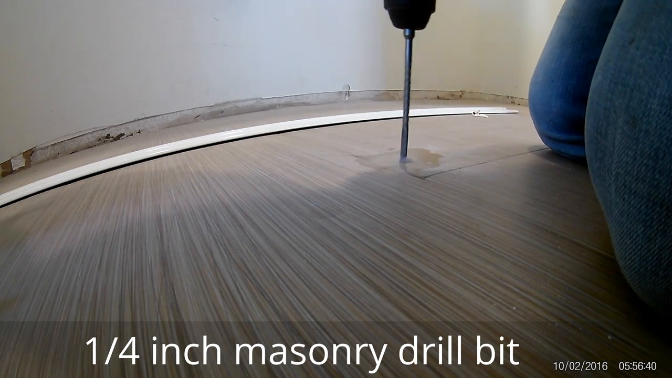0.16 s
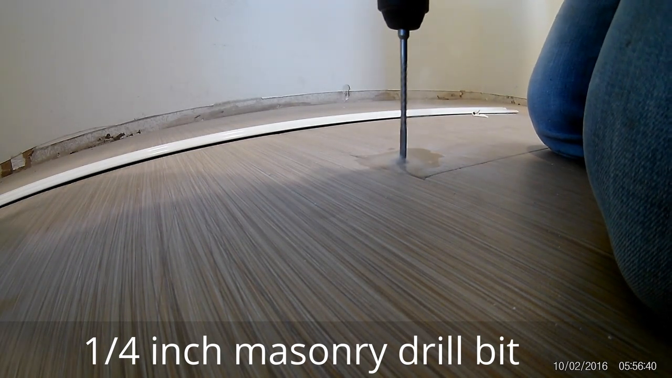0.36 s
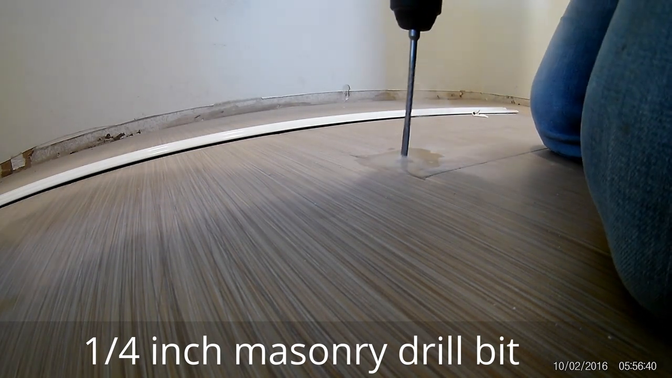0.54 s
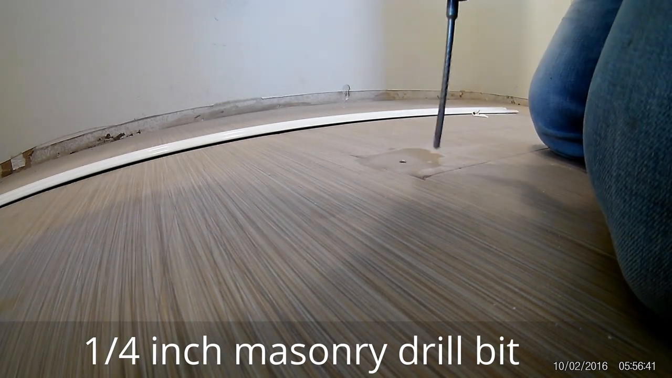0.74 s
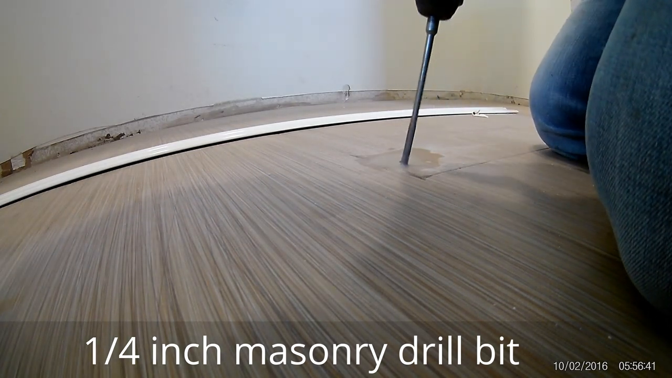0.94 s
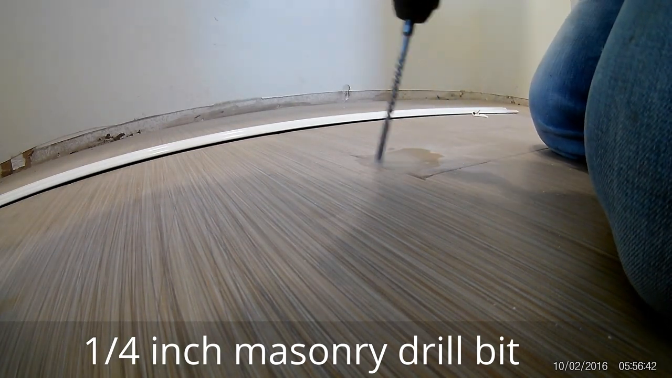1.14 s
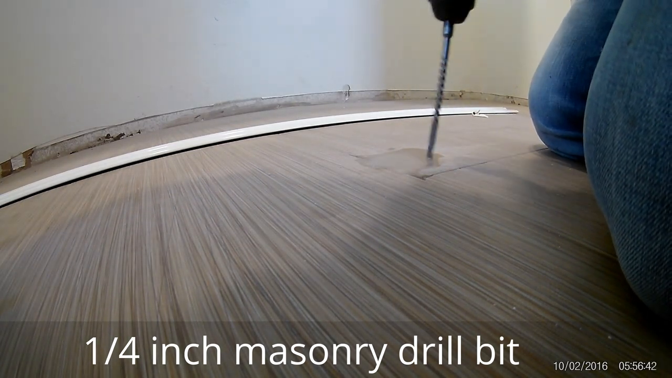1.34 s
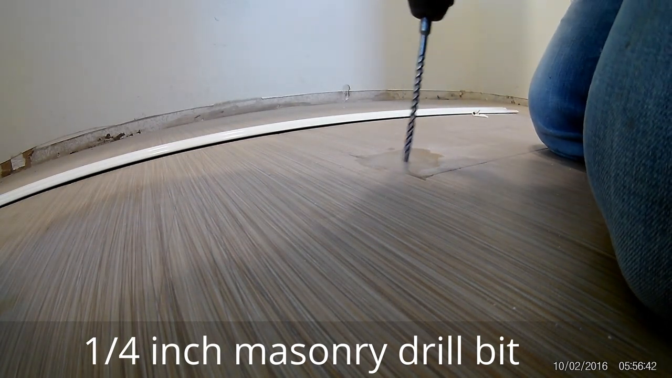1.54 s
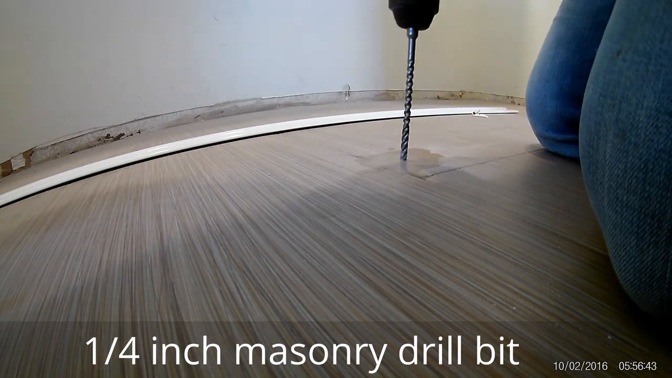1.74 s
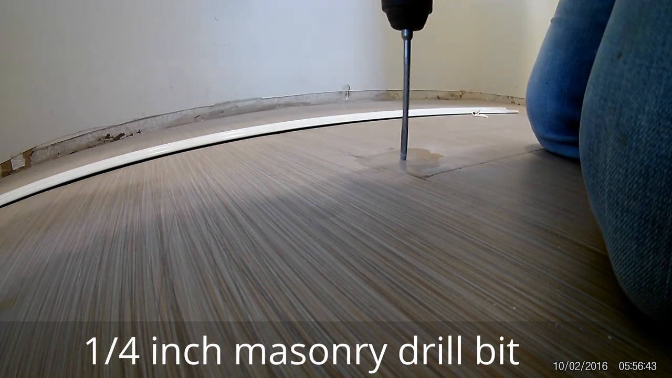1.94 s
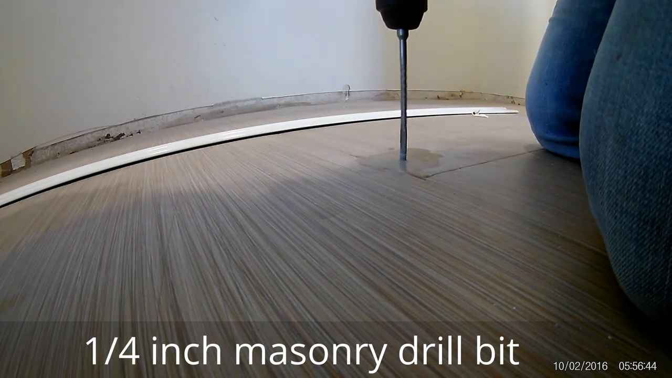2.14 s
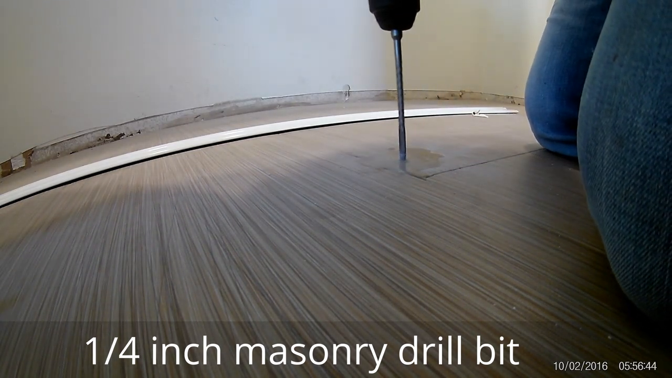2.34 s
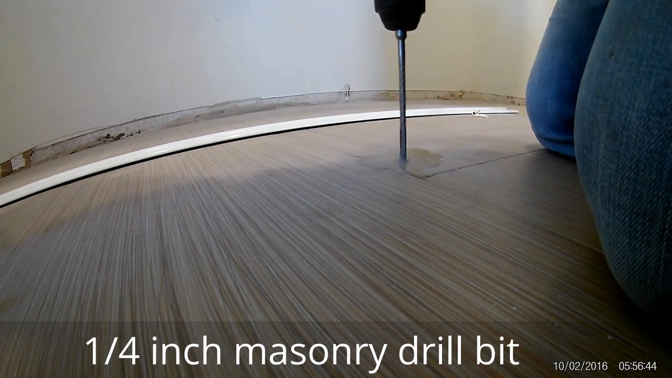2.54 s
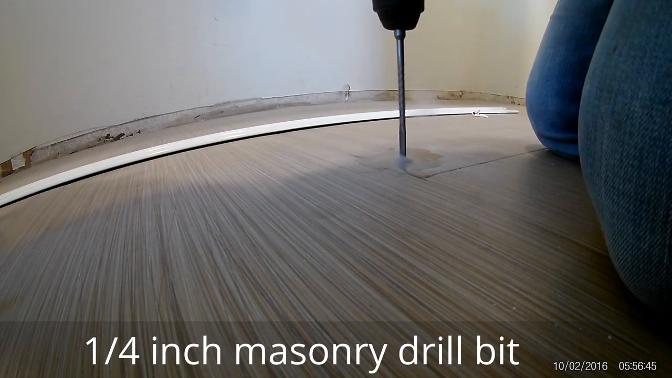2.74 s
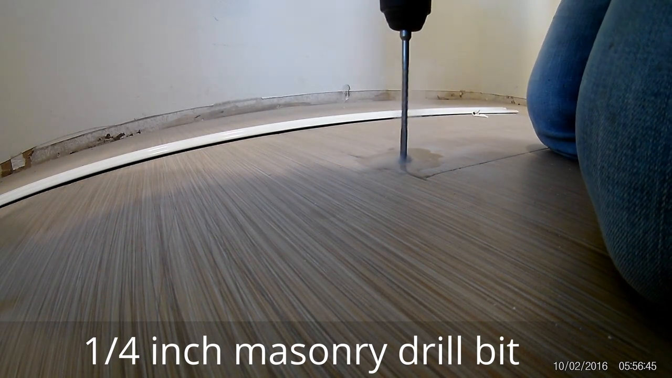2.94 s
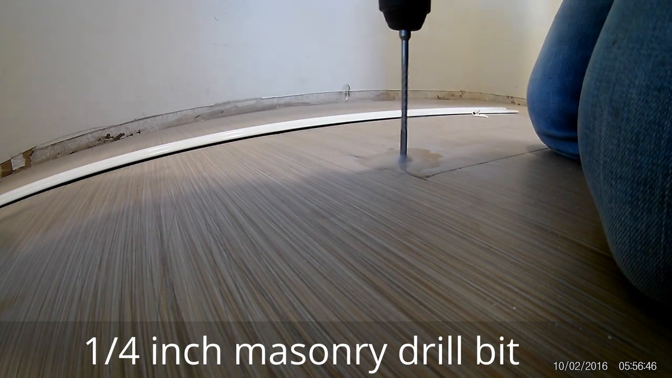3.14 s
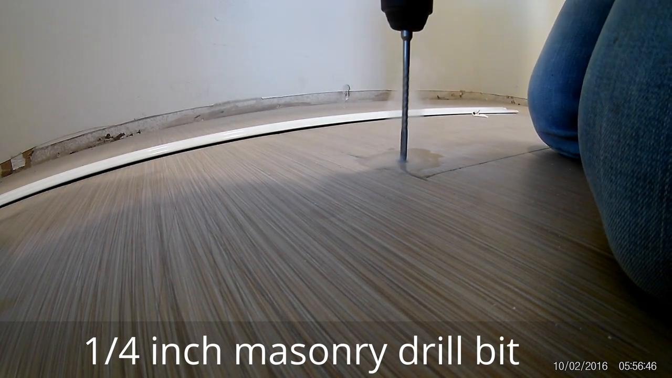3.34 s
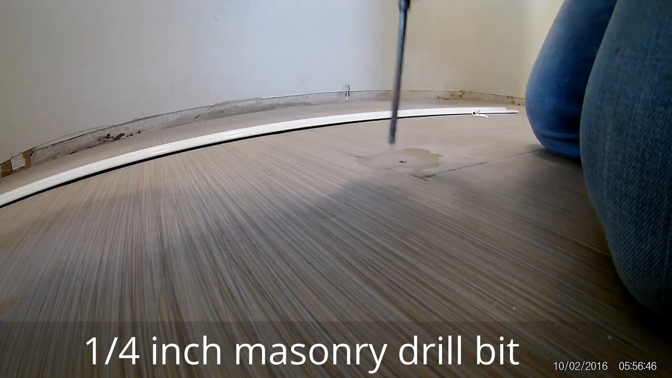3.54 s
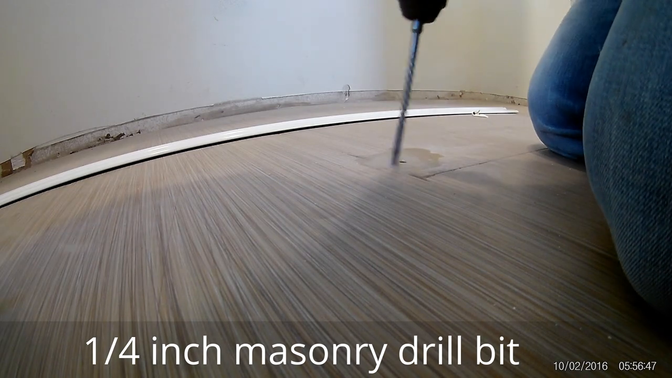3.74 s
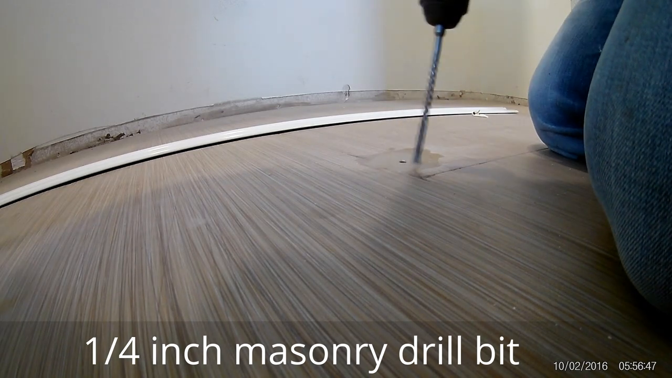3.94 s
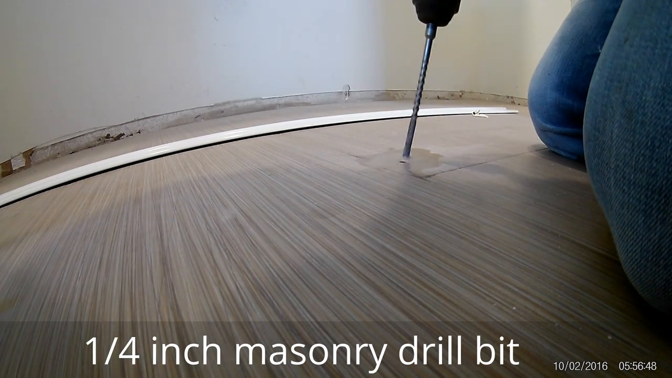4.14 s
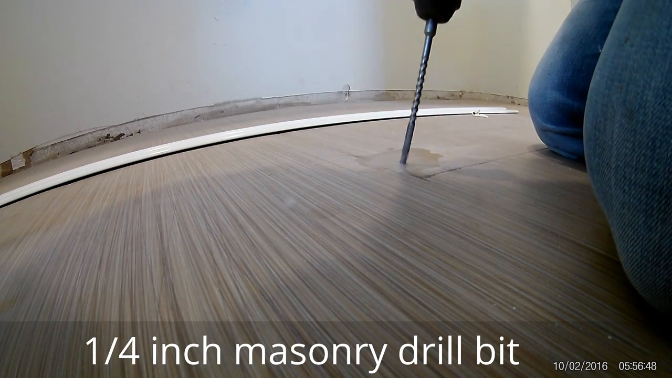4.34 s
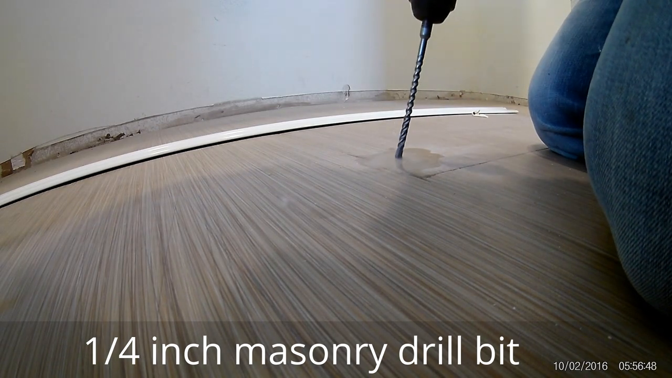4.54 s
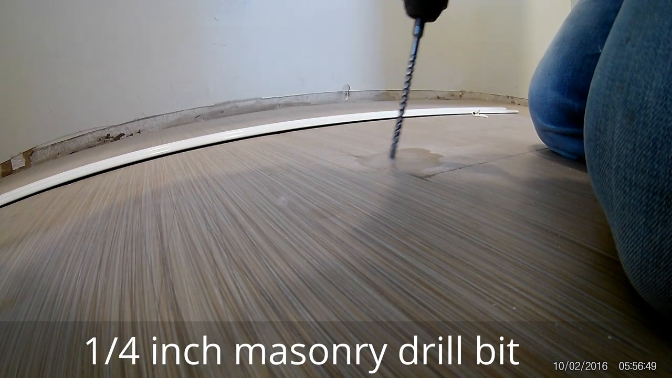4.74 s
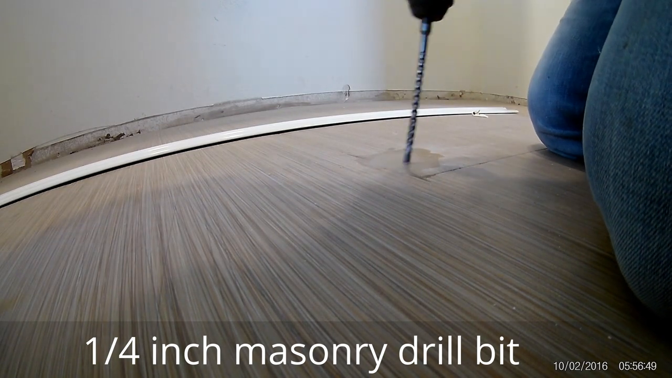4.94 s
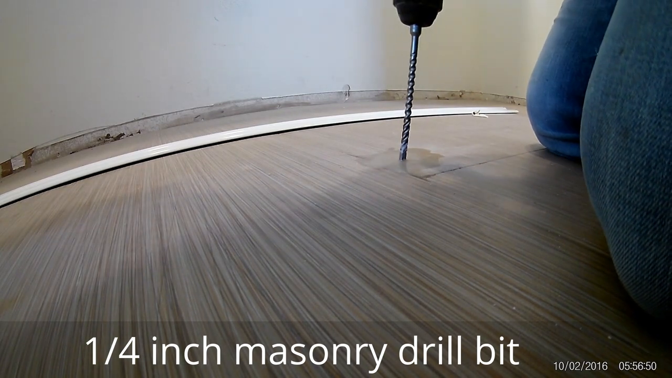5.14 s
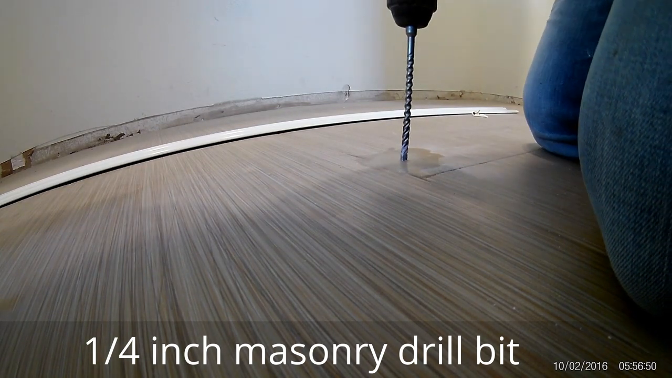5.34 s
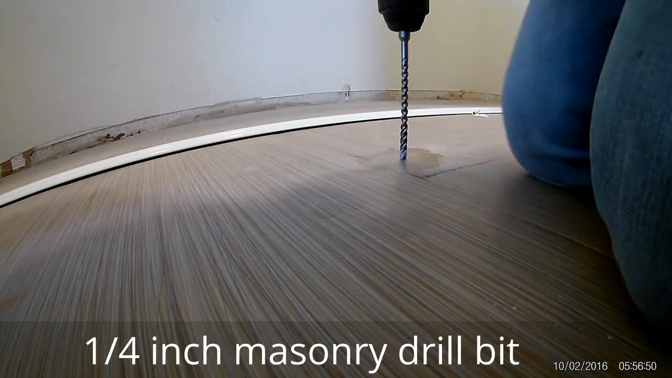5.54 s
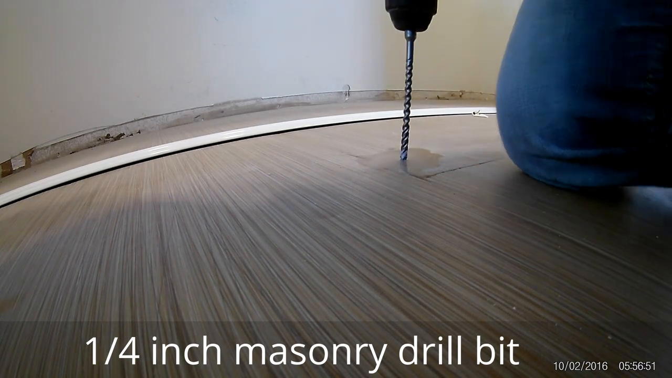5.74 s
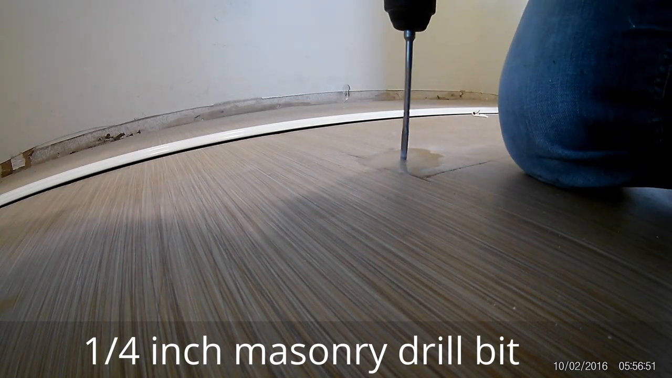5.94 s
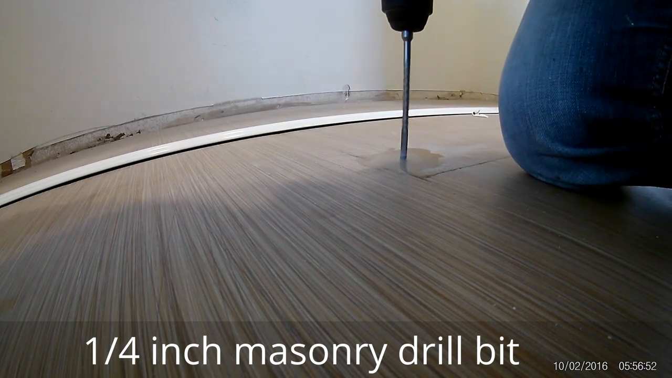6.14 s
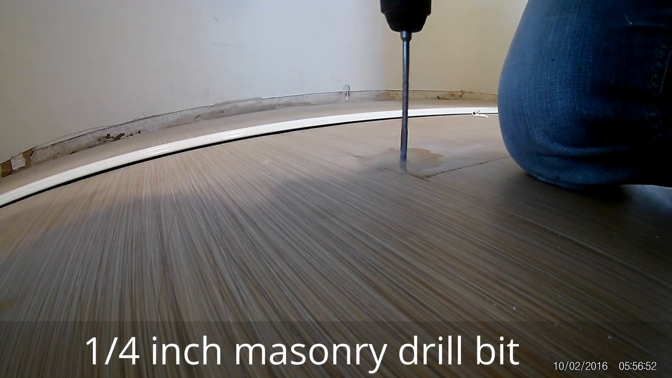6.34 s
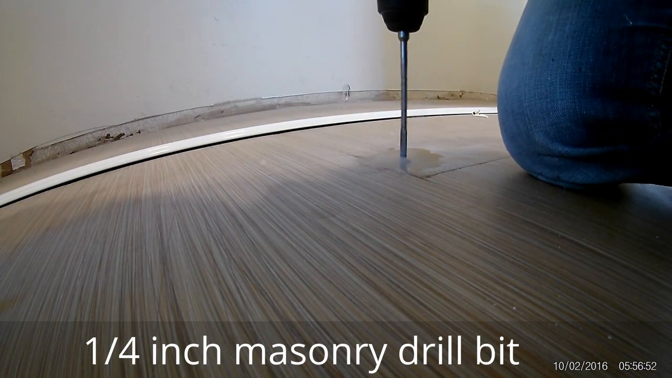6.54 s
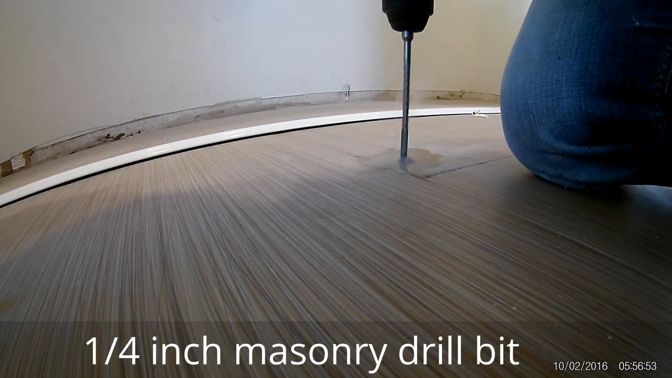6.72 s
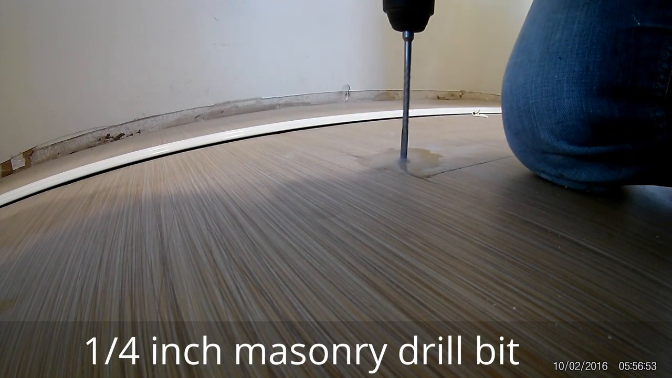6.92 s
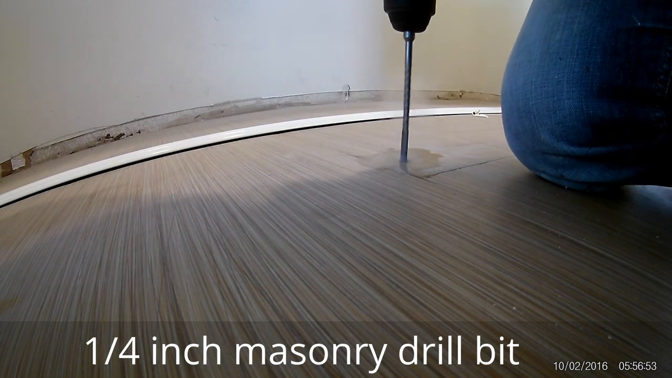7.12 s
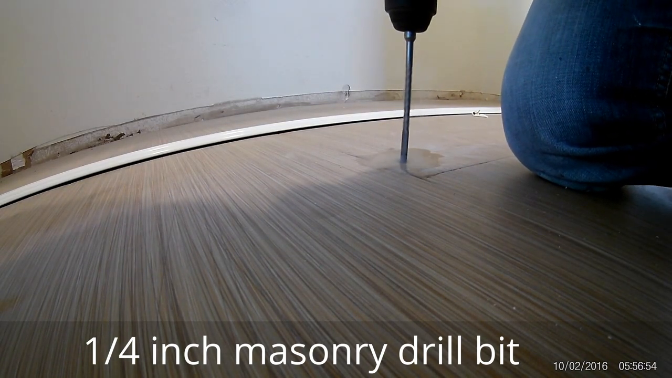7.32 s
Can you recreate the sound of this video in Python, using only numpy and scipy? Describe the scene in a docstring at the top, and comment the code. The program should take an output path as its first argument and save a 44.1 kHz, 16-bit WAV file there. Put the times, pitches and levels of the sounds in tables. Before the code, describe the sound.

Close mono pickup of a rotary hammer drill on hard tile indoors: a short tail of drilling, a rattling coast-down with bit drags and knocks, a second steady buzzing burst of about a second and a half, a longer coast-down with scratching and hard taps, then a squealing restart and buzzing drilling until the cut. Short room echo, faint room tone, little deep bass.

```python
"""A hammer drill bites into wet floor tile in three bursts in a small bare room, close to a mono microphone.
Under load its hammer drums the floor about a hundred times a second, made of sine partials and grinding noise,
and its gears hum and whine as sines that follow the motor speed. Between bursts the motor coasts down with rattle
and fan hiss, while the bit drags and knocks: noise and random clicks ring the bit and the floor. The second and
third bursts start with a trigger click and a short squeal. Quiet room tone lies under everything."""
import sys
import numpy as np
from scipy import signal
from scipy.fft import rfft, irfft, next_fast_len
from scipy.io import wavfile

SR = 44100
rng = np.random.default_rng(int(sys.argv[2]) if len(sys.argv) > 2 else 0)


def invert_db(level):
    """Linear amplitude ratio for a level in decibels (20 dB per decade), elementwise."""
    return 10 ** (np.asarray(level, dtype=float) / 20)


def master_out(mix):
    """Clip the mix to full scale and print it as 16-bit PCM to the path in sys.argv[1]."""
    frames = np.transpose(np.atleast_2d(mix))
    ceiling = np.clip(frames, -1, 1)
    pcm = np.round(ceiling * 32767).astype(np.int16)
    wavfile.write(sys.argv[1], SR, pcm)


N = 325444   # length in samples
WORKING_HZ = 870   # gear tone at working speed
BLOWS_PER_GEAR_CYCLE, TEETH_PER_GEAR_CYCLE = 3 / 26, 5


def rms_one(x):
    """Scale to rms 1."""
    return x / np.sqrt(np.mean(x ** 2) + 1e-20)


def in_time(tables, rest):
    """Columns of several tables on the sample grid, at the rest value between tables."""
    t = np.arange(N) / SR
    out = np.full((len(tables[0][0]) - 1, N), float(rest))
    for rows in tables:
        s, *columns = np.transpose(rows)
        inside = (t >= s[0]) & (t <= s[-1])
        out[:, inside] = [np.interp(t[inside], s, c) for c in columns]
    return out


def soften(x, seconds):
    """Smooth with one pole, so that steps turn into short glides."""
    r = np.exp(-1 / (seconds * SR))
    return signal.lfilter([1 - r], [1, -r], x, zi=[r * x[0]])[0]


def drift(rate_hz):
    """Slow random wandering of spread 1: noise through two equal poles, made at every 40th sample."""
    r = np.exp(-2 * np.pi * rate_hz * 40 / SR)
    slow = signal.lfilter([1], [1, -2 * r, r * r], rng.standard_normal(N // 40 + 2002))
    slow = rms_one(slow[2000:])   # skip the filter's start
    return np.interp(np.arange(N) / 40, np.arange(len(slow)), slow)


def colour(x, spectrum):
    """Give a dense signal the shape of a spectrum, at rms 1."""
    size = next_fast_len(N)
    hz, level_db = np.transpose(spectrum)
    log_hz = np.log(np.arange(1, size // 2 + 2) * SR / size)
    gain = invert_db(np.interp(log_hz, np.log(hz), level_db))
    return rms_one(irfft(rfft(x, size) * gain, size)[:N])


def resonate(x, modes):
    """Ring parallel resonances of alternating sign; a narrower one rings longer."""
    out = 0
    for k, (hz, width_hz, level_db) in enumerate(modes):
        r = np.exp(-np.pi * width_hz / SR)
        top = [(1 - r * r) / 2, 0, (r * r - 1) / 2]
        bottom = [1, -2 * r * np.cos(2 * np.pi * hz / SR), r * r]
        out = out + (-1) ** k * invert_db(level_db) * signal.lfilter(top, bottom, x + 1e-18)
    return out


def between(x, low_hz, high_hz):
    """Butterworth band-pass."""
    return signal.sosfilt(signal.butter(3, [low_hz, high_hz], "band", fs=SR, output="sos"), x)


def grains(per_s, spread_db):
    """Random clicks of either sign; a larger spread makes their sizes less even."""
    sizes = invert_db(spread_db * np.minimum(rng.exponential(1, N), 5)) * rng.choice([-1, 1], N)
    return sizes * (rng.random(N) < per_s / SR)


def swell(at_s, rise_s, fall_s, level_db):
    """Gain that climbs to a peak and sinks again, straight in dB; one value a millisecond."""
    since = np.arange(0, N / SR, .001) - at_s
    return invert_db(level_db - 20 * np.maximum(-since / rise_s, since / fall_s))


# Gear tone while the trigger is held, one table a burst: start_s [s], pitch_hz [Hz]
BURSTS = [
    [(0, 868.5), (.26, 880), (.49, 866), (.57, 862.5)],
    [(1.9, 303), (1.95, 516.8), (2.034, 760), (2.09, 836.5), (2.148, 870.4), (2.21, 892), (2.3, 899),
     (2.44, 889.2), (2.78, 868), (2.85, 860), (3.12, 863), (3.18, 852), (3.31, 857), (3.5, 850.5)],
    [(5.825, 330), (5.9, 585), (5.94, 704), (5.99, 775.7), (6.09, 692.4), (6.14, 749.6), (6.2, 831),
     (6.26, 861.3), (6.4, 903), (6.5, 891.7), (6.7, 884.3), (6.95, 870), (7.38, 872)],
]
# Trigger let go: start_s [s], pitch_hz then [Hz], slowing [1/s], extra_slowing [1/s2]
COASTS = [(.575, 832.4, 1.02, .44), (3.5, 817, 1.02, .44)]


def gear_speed():
    """Gear tone in Hz over time, and 1 while coasting: friction and the fan slow the free rotor."""
    t, hz, coasting = np.arange(N) / SR, in_time(BURSTS, rest=0)[0], np.zeros(N)
    for (start_s, start_hz, slowing, extra), before, after in zip(COASTS, BURSTS, BURSTS[1:]):
        free = (t > before[-1][0]) & (t < after[0][0])
        since = t[free] - start_s
        hz[free] = start_hz * np.exp(-slowing * since - extra * since ** 2)
        coasting[free] = 1
    return soften(hz, .004), soften(coasting, 0.016)


# Multiples of the blow rate: multiple [blow rate], level_db at usual feed [dB],
# follows [0 bite, 1 weight, 2 buzz], share of that feed's swing [0 to 1], waver_db [dB]
BLOW_PARTIALS = [(1, -27, 1, .99, .5), (1.5, -41, 1, 0.082, 3.5), (2, -35, 0, 0.17, 3), (3, -20, 0, 1, 2),
                 (4, -21.5, 2, 0.82, 1.5), (5, -27, 2, 0.81, 2.5), (6, -33, 2, 1, 3), (7, -23, 2, 0.88, 3),
                 (8, -21, 0, 0.25, 2.5), (11, -29, 2, 0.37, 3.5), (12, -27.5, 2, 0.27, 2),
                 (14, -35, 2, 0.36, -6), (15, -34.5, 2, 0.2, 3.5), (16, -40.5, 2, 0.4, 7.5),
                 (19, -40, 2, .6, 0), (20, -26.5, 2, 0.21, 5.5)]
# The hand on the drill, one table a burst: start_s [s], bite_db of the tip [dB],
# weight_db leaned on the floor [dB], buzz_db of the tile [dB]
FEED = [
    [(0.0, -31, -50, -25), (0.056, -16, -38, -20), (0.154, -22, -34, -30.5), (0.182, -22, -37, -27),
     (0.338, -31, -43, -28), (0.386, -44, -57, -28), (0.426, -32, -48, -32), (0.474, -21, -64, -29),
     (0.506, -19, -43, -29), (0.558, -18, -40, -23), (0.618, -32, -43, -45), (0.678, -49, -75, -54),
     (0.72, -63, -52, -62)],
    [(1.9, -50, -54, -48), (2.016, -35, -47, -28), (2.094, -18, -53, -40), (2.182, -26, -36, -22),
     (2.314, -14, -36, -23.5), (2.358, -17, -37, -32), (2.464, -27.5, -29, -28.5), (2.826, -26, -33.5, -34),
     (3.02, -43, -27, -26.5), (3.098, -20.5, -28.5, -25), (3.356, -20.5, -29.5, -32.5),
     (3.474, -21, -29, -25), (3.65, -71, -58, -64)],
    [(5.83, -26, -47, -42), (5.89, -40, -44, -22), (5.984, -31, -27, -20.5), (6.252, -28, -29, -32),
     (6.364, -16, -24, -21.5), (6.782, -21.5, -24, -21.5), (6.876, -32, -26, -14.5),
     (6.958, -19, -26.5, -16.5), (7.05, -19, -28, -11.5), (7.148, -28, -25, -22), (7.226, -16, -29, -13),
     (7.352, -22, -26, -18), (7.38, -19, -30, -10)],
]
# Usual feed: bite_db, weight_db, buzz_db [dB]
USUAL_FEED_DB = [-22, -32, -24]
# Shape of the grinding noise: pitch_hz [Hz], level_db [dB per Hz, relative]
GRIND_SPECTRUM = [(530, -53), (900, -13), (944, -9), (1050, -5.5), (1510, -3), (1700, -0.5), (2160, 0),
                  (3220, -7), (3980, -12.5), (4270, -13.5), (4750, -17), (6240, -19), (8880, -16.5),
                  (12800, -31), (15100, -66)]
# Shape of the floor noise under the blows: pitch_hz [Hz], level_db [dB per Hz, relative]
RUMBLE_SPECTRUM = [(40, -50), (70, -33), (102, -17), (200, -41), (300, 5), (360, -10.5), (410, -3.5),
                   (480, -7.5), (720, 2.5), (940, -7), (1300, -30.5)]
# Ringing of chuck and bit under load: pitch_hz [Hz], width_hz [Hz], level_db [dB, relative]
TOOL_MODES = [(1330, 40, -13), (1722, 16, 12.5), (1890, 31, 5), (2310, 29, -7.5), (3460, 620, -2),
              (3860, 80, 21), (4870, 140, 3)]
# Resonances of the floor: pitch_hz [Hz], width_hz [Hz], level_db [dB, relative]
FLOOR_MODES = [(136, 27, -11.5), (296.6, 24, -3), (417, 19, -0.5), (540, 44, -3), (731, 43, -0.5),
               (770, 19, 4), (1014, 46, -11.5)]


def hammer(hz, turns, coasting, unsettled):
    """Blows drum the floor as partials, ragged at low speed; each clicks and the tip grinds in a spurt after it."""
    run_out_s, let_go_s = 0.047, 0.014   # the drumming runs on longer than the grinding
    feed_db = in_time(FEED, rest=-60) - np.reshape(USUAL_FEED_DB, (3, 1))   # above or below usual
    blows = BLOWS_PER_GEAR_CYCLE * turns
    stumble = .12 * unsettled * drift(25)
    drumming = 0
    for multiple, level_db, follows, share, waver_db in BLOW_PARTIALS:
        # below working speed the second partial swells and those far from it fade
        skid_db = unsettled * (7 - 6.5 * abs(np.log2(multiple / 2)))
        level = invert_db(level_db + skid_db + waver_db * drift(13.6) + share * feed_db[round(follows)])
        phase = multiple * (2 * np.pi * blows + 0.054 * drift(7.2) + stumble)
        drumming = drumming + level * np.sin(phase + rng.normal(0, .6))

    spurt = 1 + .6 * np.exp(-3.0 * (blows % 1))   # strongest just after each blow
    grit = rng.standard_normal(N) + 0.53 * rms_one(grains(per_s=1800, spread_db=0.0))
    grit = rms_one(grit * spurt * invert_db(0.64 * drift(7)))
    clicks = np.diff(np.floor(blows + .03 * drift(60)), prepend=0) * invert_db(1.1 * drift(63))
    grit = grit + 0.35 * (1 - unsettled) * rms_one(clicks)
    grinding = colour(grit, GRIND_SPECTRUM)
    grinding += invert_db(-15.5) * rms_one(resonate(grit, TOOL_MODES))
    grinding += invert_db(-8) * colour(grit, RUMBLE_SPECTRUM)
    # a skidding tip shakes the floor modes
    grinding += invert_db(-8) * unsettled * rms_one(resonate(grit, FLOOR_MODES))
    # 7 dB per octave of speed, and a little with the bite
    grind_db = -14.5 + 7 * np.log2(np.clip(hz / WORKING_HZ, .01, 1)) + 0.021 * feed_db[0]
    drumming = (1 - soften(coasting, run_out_s)) * drumming
    return drumming + (1 - soften(coasting, let_go_s)) * invert_db(grind_db) * grinding


# Gear tone as the floor carries it: pitch_hz [Hz], level_db [dB rms before waver]
HUM = [(300, -50), (560, -42), (650, -35), (720, -15.5), (780, -24.5), (835, -29), (870, -24.5), (900, -41)]
# Tooth whine as the case carries it: pitch_hz [Hz], level_db [dB rms before waver]
WHINE = [(1500, -50), (2900, -49), (3500, -32), (3950, -32.5), (4200, -24), (4290, -31.5), (4360, -21.5),
         (4440, -26.5), (4500, -34)]
# Fine lines beside the whine: multiple [gear tone], level_db [dB before waver]
SIDE_TONES = [(2, -23.5), (5.43, -42), (5.83, -37), (6.05, -33), (6.26, -36), (8.13, -38.5), (8.67, -37.5),
              (9.17, -44), (10, -37)]
# Rotor tones: multiple [gear tone], level_db before the case and the speed act on it [dB]
ROTOR_TONES = [(15, -40), (20, -46), (24, -44), (30, -52), (39, -52)]
# What the case lets out: pitch_hz [Hz], level_db [dB]
HOUSING = [(3500, -30), (4600, -14), (5200, -2), (5900, -17), (7500, 0), (9500, -16), (11000, -5),
           (12500, -18), (14500, -24), (15500, -26)]


def gear_tones(hz, turns, coasting, unsettled):
    """Loaded gears hum and whine; rotor tones slide through the resonances of the case."""
    loaded = 1 - coasting
    gear_phase = 2 * np.pi * turns
    tooth_hz, tooth_phase = TEETH_PER_GEAR_CYCLE * hz, TEETH_PER_GEAR_CYCLE * gear_phase
    hum = loaded * invert_db(np.interp(hz, *np.transpose(HUM))) * np.sqrt(2)
    whine = loaded * invert_db(np.interp(tooth_hz, *np.transpose(WHINE))) * np.sqrt(2)
    hum = soften(hum, 0.0067) * invert_db(4.0 * drift(4.5))
    out = hum * np.sin(gear_phase + (.15 + .9 * unsettled) * drift(30))
    whine = soften(whine, 0.0096) * invert_db(2.5 * drift(15))
    out += whine * np.sin(tooth_phase + .25 * drift(60))

    fading = np.clip((hz - 370) / 180, 0, 1)
    fading = fading + 1.85 * np.exp(-((hz - 770) / 60) ** 2)   # swells past a floor mode
    out += coasting * fading * invert_db(-34.5 + 2 * drift(5)) * np.sin(gear_phase)

    for multiple, level_db in SIDE_TONES:
        level = loaded * (1 - unsettled) ** 2 * invert_db(level_db + 3.2 * drift(8.9))
        out += level * np.sin(multiple * gear_phase + 0.23 * drift(30))

    case_hz, case_db = np.transpose(HOUSING)
    push = coasting * (hz / 500) ** 1.5   # weaker as the rotor slows
    for multiple, level_db in ROTOR_TONES:
        escapes_db = np.interp(multiple * hz, case_hz, case_db, left=-90, right=-90)
        level = push * invert_db(level_db + escapes_db + 2.5 * drift(9))
        out += level * np.sin(multiple * gear_phase + .8 * drift(30))
    return out


# Shape of the room tone: pitch_hz [Hz], level_db [dB per Hz, relative]
ROOM_TONE_SPECTRUM = [(15, -32), (25, -16), (86, -10.5), (264, -17.5), (811, -22.5), (1350, -26),
                      (1670, -36), (3440, -24), (6200, -46), (15000, -49)]


def room_tone():
    """Steady quiet noise, strongest in the low range."""
    return invert_db(-48) * colour(rng.standard_normal(N), ROOM_TONE_SPECTRUM)


# Shape of the gear rattle: pitch_hz [Hz], level_db [dB per Hz, relative]
RATTLE_SPECTRUM = [(35, -63), (60, -38), (194, -31), (404, -24), (472, -15.5), (721, -5), (962, -7.5),
                   (1650, 1.5), (1890, -3.5), (2470, -1.5), (6000, -19), (7800, -44), (13200, -120)]
# Shape of the fan hiss: pitch_hz [Hz], level_db [dB per Hz, relative]
FAN_SPECTRUM = [(2650, -37), (4500, -27), (6420, -3), (7700, 5), (9290, 3), (10700, -4), (13000, -9),
                (15100, -23)]


def motor(hz, coasting):
    """While coasting, loose gears rattle and the fan hisses, both sinking with speed."""
    speed = np.clip(hz / WORKING_HZ - .1, 0, 1)
    rattle = rng.standard_normal(N) + 0.74 * rms_one(grains(per_s=1200, spread_db=-10.5))
    rattle = speed ** 0.95 * invert_db(-19.0 + 0.84 * drift(23)) * colour(rattle, RATTLE_SPECTRUM)
    fan = invert_db(-30) * speed ** 1.13 * colour(rng.standard_normal(N), FAN_SPECTRUM)
    return coasting * (rattle + fan)


# Scrapes of the bit over the tile, and a faint rustle at 5.62 s: loudest_s [s],
# rise_s and fall_s [s for 20 dB], level_db [dB, relative], thud_db share of the floor [dB]
SCRAPES_AND_RUSTLE = [(.62, 0.057, 0.26, -10.5, -21), (.85, 0.35, 0.5, -21.5, -14),
                      (1.133, .06, 0.086, -13, -8), (1.2, 0.022, .1, -31, -3),
                      (1.33, 0.14, 0.17, -19.5, -13), (1.412, 0.11, 0.1, -13.5, -8.5),
                      (1.48, 0.17, .2, -28, -9), (1.6, 0.25, 0.092, -19, -10.5),
                      (1.715, 0.025, 0.074, -16.5, 8), (3.55, .03, 0.087, -9.5, -21),
                      (3.65, .1, .3, -13.5, -18), (3.76, 0.068, 0.22, -12, -8.5),
                      (3.93, 0.069, 0.17, -15, -8), (3.999, .1, .12, -27, 1), (4.15, 0.061, .15, -19, -22),
                      (4.216, 0.085, 0.045, -15, -4), (4.3, 0.055, .08, -23, -20),
                      (4.37, 0.023, 0.089, -19, -13), (4.53, 0.026, 0.14, -17.5, -12),
                      (4.61, .04, 0.066, -17.5, -10.5), (4.66, 0.044, 0.026, -22.5, -0.5),
                      (4.72, 0.022, .08, -28, -14), (4.8, .02, 0.1, -28.5, -6),
                      (4.92, 0.027, 0.08, -12, -22), (4.976, 0.079, 0.04, -12, -4),
                      (5.062, 0.028, .05, -15, -4.5), (5.298, 0.0098, .03, -24, -11),
                      (5.385, .03, 0.046, -38, -4), (5.5, .06, 0.27, -38.5, -12),
                      (5.62, .04, 0.034, -40, -14), (5.765, .03, 0.054, -41, -5)]
# Ring of the bit: pitch_hz [Hz], width_hz [Hz], level_db [dB, relative]
BIT_MODES = [(1154, 16, 6), (1367, 113, -0.5), (1640, 46, 4), (1990, 188, 3), (2760, 206, -2),
             (3140, 320, -5.5), (4550, 68, -7.5)]


def drag():
    """Stick-slip clicks over fine noise, through bit and floor modes, in swells and after each knock or click."""
    # a short chatter follows each knock or click
    chatter = [(s + 0.0078, .004, 0.067, level_db - 11.5, thud_db + 11)
               for s, level_db, thud_db, *_ in KNOCKS_AND_CLICKS]
    ring_power, thud_power = 0, 0
    for at_s, rise_s, fall_s, level_db, thud_db in SCRAPES_AND_RUSTLE + chatter:
        gain = swell(at_s, rise_s, fall_s, level_db)
        ring_power = ring_power + gain ** 2
        thud_power = thud_power + (gain * invert_db(thud_db)) ** 2
    grid_s = np.arange(len(ring_power)) / 1000   # one step a millisecond
    ring_gain = np.sqrt(np.interp(np.arange(N) / SR, grid_s, ring_power))
    thud_gain = np.sqrt(np.interp(np.arange(N) / SR, grid_s, thud_power))

    slips = rms_one(grains(per_s=900 * invert_db(5.0 * drift(30)), spread_db=3.0))
    slips = slips + 0.56 * rng.standard_normal(N)
    ring = rms_one(between(resonate(slips, BIT_MODES), 700, 5500))
    hiss = rms_one(between(slips, 1800, 7700))
    thud = rms_one(between(resonate(slips, FLOOR_MODES), 112.6, 1520))
    thud = thud + invert_db(-2) * rms_one(between(slips, 240, 1220))
    return invert_db(-8) * ring_gain * (ring + invert_db(-19.5) * hiss) + invert_db(-9.5) * thud_gain * thud


def room(x):
    """Echo of the bare room: eight feedback delays, duller on every round."""
    t60_s, wall_cut_hz = 0.27, 2540   # time to fade by 60 dB; treble loss at each round
    out, dull = np.zeros(N), np.exp(-2 * np.pi * wall_cut_hz / SR)
    for k, lag in enumerate((rng.uniform(.012, .03, 8) * SR).astype(int)):
        loop, gain, state = x.copy(), invert_db(-60 * lag / SR / t60_s), [0.]
        for i in range(lag, N, lag):
            back, state = signal.lfilter([gain * (1 - dull)], [1, -dull], loop[i - lag:i], zi=state)
            loop[i:i + lag] += back[:N - i]
        out += (loop - x) * (-1) ** k   # echo only
    return out


# Knocks on the tile, and a click of the trigger at 1.914 and 5.827 s: start_s [s], level_db [dB, relative],
# then shares relative to it: thud_db of the floor [dB], boom_db [dB], crack_db [dB]
KNOCKS_AND_CLICKS = [(1.094, -18.5, -12, -41, -23), (1.192, -17, -18, -32, -26),
                     (1.682, -16.5, 1.5, -30, -27), (1.708, -20, -10, -31, -34), (1.721, -27, -2, -33, -26),
                     (1.748, -21, 0.5, -33, -19), (1.783, -12, -4, -28, -29), (1.914, -16.5, -15, -30, -25),
                     (3.974, -14, -8, -45, -31), (4.299, -22, -19, -36, -27), (4.518, -18, -12.5, -37, -26),
                     (4.709, -24.5, -16, -31, -27), (4.789, -27, -20, -29, -26),
                     (4.883, -33, -15, -40, -25), (4.911, -19, -24, -55, -36), (5.078, -34, -20, -40, -8),
                     (5.199, -15.5, -7, -17, -32), (5.232, -16, 2, -21, -27), (5.305, -17, -2, -15, -27),
                     (5.399, -4.5, -7.5, -14, -32), (5.549, -44, -10, 1, -26), (5.727, -32.5, -2, 3.5, -12),
                     (5.827, -27, -1.5, -15, -16)]
# Deep boom of the floor: pitch_hz [Hz], width_hz [Hz], level_db [dB, relative]
JOIST_MODES = [(83, 22, -1.5), (147, 25, 3), (248, 190, 2), (334, 70, 6)]


def knocks_and_clicks():
    """Short noise bursts (dry snap, ring of the bit, floor thud, bright crack), each with a push that booms late."""
    start_s, level_db, thud_db, boom_db, crack_db = np.transpose(KNOCKS_AND_CLICKS)
    at, length = np.round(start_s * SR).astype(int), 900   # samples
    dying = np.exp(-np.arange(length) / (0.0043 * SR))
    bursts = rng.standard_normal((len(at), length)) * dying
    bursts[:, :4] += 3.0   # the first touch is a hard tick
    gains = invert_db(level_db + [0 * start_s, thud_db, crack_db])
    paths, push = np.zeros((3, N)), np.zeros(N)
    for i, burst, path_gains in zip(at, bursts, np.transpose(gains)):
        paths[:, i:i + length] += path_gains[:, None] * burst
    push[at + SR // 250] = invert_db(level_db + boom_db)   # 4 ms late
    push = soften(soften(push, 0.00035), 0.00035)

    direct, thud, crack = paths
    out = invert_db(-10) * between(direct, 400, 3870)   # dry snap
    out += invert_db(9.5) * between(resonate(direct, BIT_MODES), 710, 3670)
    out += invert_db(18.5) * between(resonate(thud, FLOOR_MODES), 84, 2200)
    out += invert_db(3) * between(thud, 290, 1500)
    out += invert_db(54) * resonate(push, JOIST_MODES)
    return out + invert_db(5.5) * between(crack, 4500, 10700)


# The drill squeals as it starts: loudest_s [s], level_db [dB]
SQUEALS = [(1.92, -34), (5.875, -23)]


def squeals():
    """Short noisy squeals: noise sent twice through one narrow resonance."""
    gain = sum(swell(s, .03, .025, level_db) for s, level_db in SQUEALS)
    narrow = [(5150, 250, 0)]   # pitch Hz, width Hz, level dB
    tone = rms_one(resonate(resonate(rng.standard_normal(N), narrow), narrow))
    return np.interp(np.arange(N) / SR, np.arange(len(gain)) / 1000, gain) * tone


def scene():
    """Drill; drags, knocks and clicks with their room echo; and room tone."""
    hz, coasting = gear_speed()
    turns = np.cumsum(hz) / SR   # gear cycles so far
    unsettled = np.clip((860 - hz) / 200, 0, 1)   # 1 well below working speed
    drill = hammer(hz, turns, coasting, unsettled) + gear_tones(hz, turns, coasting, unsettled)
    drill += motor(hz, coasting) + squeals()
    loose = drag() + knocks_and_clicks()
    no_bass = signal.butter(3, 65, "high", fs=SR, output="sos")   # the microphone picks up little deep bass
    drill, loose = signal.sosfilt(no_bass, [drill, loose])
    return (drill + loose + invert_db(-12.5) * room(loose) + room_tone())[None]


def roll_off(x):
    """The treble ends steeply here."""
    return signal.sosfilt(signal.butter(12, 15260, fs=SR, output="sos"), x)


def record(dry):
    """The small microphone loses the top; the loudest peaks are squeezed."""
    top_cut = signal.cheby2(10, 50, 15550, fs=SR, output="sos")
    heard = signal.sosfilt(top_cut, dry)
    squeezed = np.clip(1.151 * np.tanh(heard / 1.112), -1, 1)
    return roll_off(squeezed)


dry = scene()
out = record(dry)
master_out(out)
```